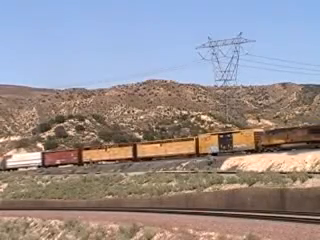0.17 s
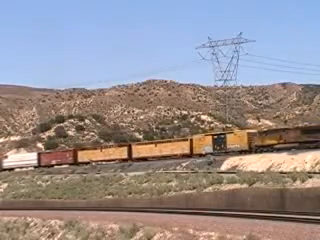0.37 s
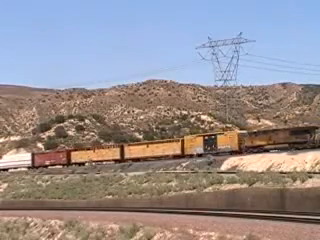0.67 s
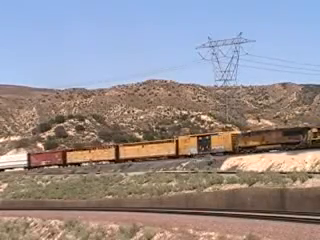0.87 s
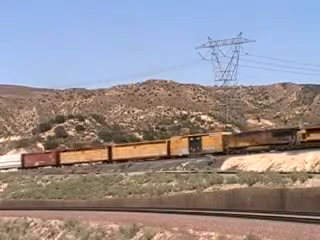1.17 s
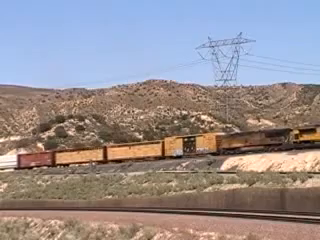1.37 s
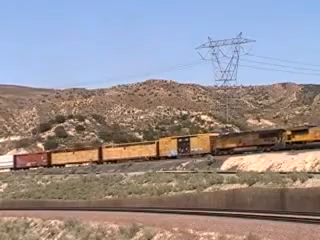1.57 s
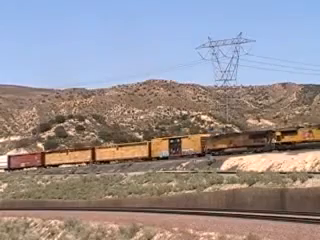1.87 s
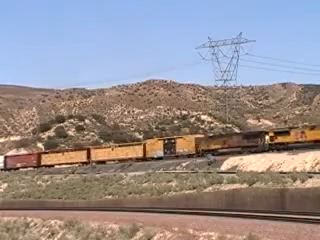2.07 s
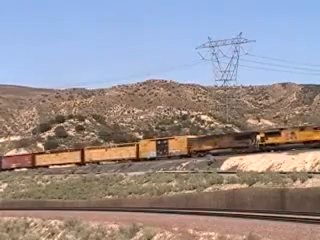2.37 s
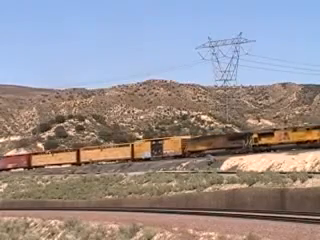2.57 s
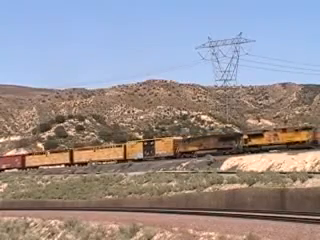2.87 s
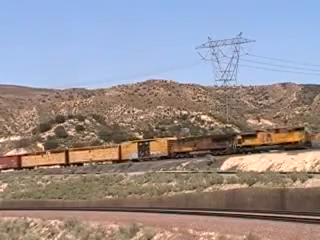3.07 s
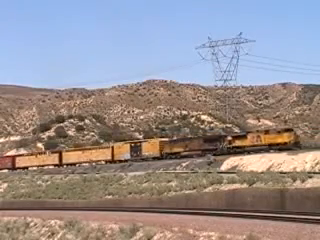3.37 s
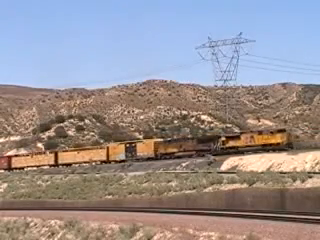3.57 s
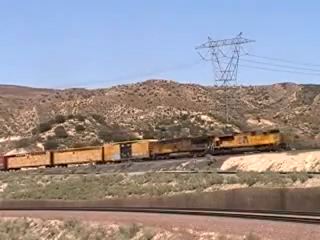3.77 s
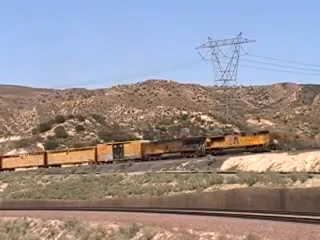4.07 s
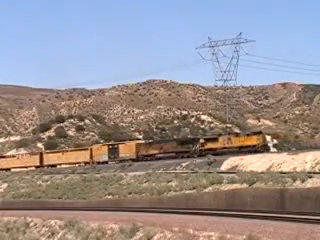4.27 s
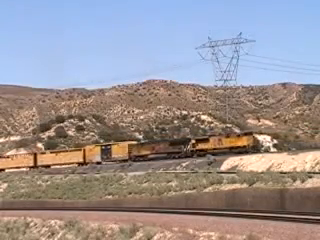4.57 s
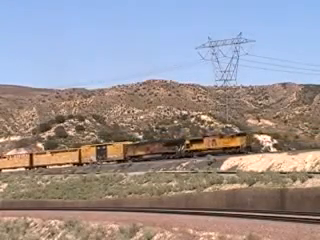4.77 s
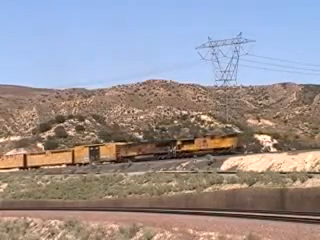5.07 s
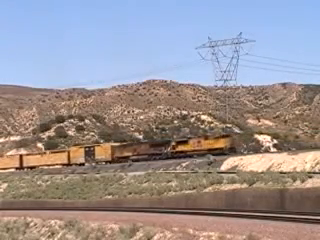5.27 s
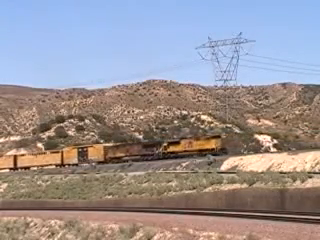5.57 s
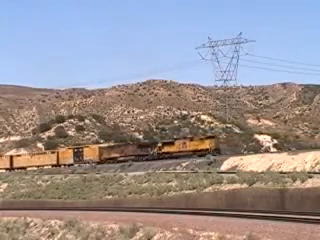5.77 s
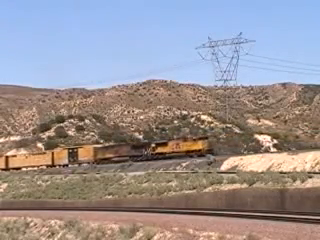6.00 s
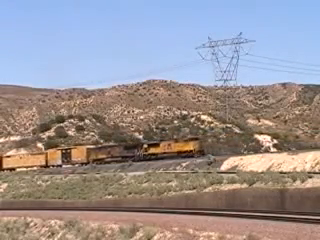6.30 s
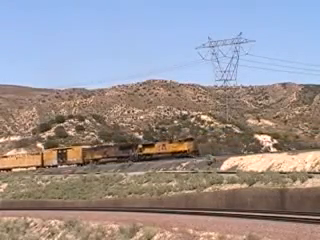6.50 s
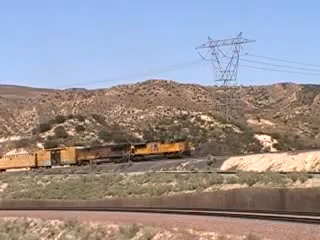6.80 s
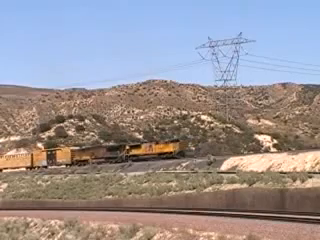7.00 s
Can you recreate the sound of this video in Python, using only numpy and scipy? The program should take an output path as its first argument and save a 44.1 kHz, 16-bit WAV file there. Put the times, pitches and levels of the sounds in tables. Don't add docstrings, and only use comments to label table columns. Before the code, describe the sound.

Outdoors in an open dry valley, a freight train with two diesel locomotives at its rear recedes. Two cooling fans hold a mid-pitched whine, beating about five times a second, over broad wheel and air roar. The whine peaks between one and two and a half seconds, sinks, then returns in softer swells. A small camera microphone far away adds faint close hiss and tiny ticking.

```python
import sys
import numpy as np
from scipy import signal
from scipy.fft import rfft, irfft, next_fast_len
from scipy.io import wavfile
from scipy.ndimage import uniform_filter1d

SR = 44100
rng = np.random.default_rng(int(sys.argv[2]) if len(sys.argv) > 2 else 0)


def boost(x):
    u = np.asarray(x, float) / 20
    return 10 ** u


def generate_wav(signal):
    frames = np.transpose(np.atleast_2d(signal))
    scaled = np.clip(frames, -1, 1) * 32767
    pcm = np.round(scaled).astype(np.int16)
    wavfile.write(sys.argv[1], SR, pcm)


N = 314874
TIME = np.arange(N) / SR

# (f/Hz, level/dB per Hz)
HISS_COLOUR = [(2500, -2), (5000, -2), (7000, -2.5), (10000, -8)]
# (t/s into the turn, level/dB)
HEAD_TICKS = [(.0085, -7.5), (0.0067, 2.5), (.0251, -1.5), (.0105, -7.5)]
# (f/Hz, level/dB, t60/s)
BODY_MODES = [(5930, -73, .02), (6270, -71, .012), (7200, -71, .004), (7900, -68, .022), (8640, -72, .014)]

# (t/s, rolling cars level/dB, locomotives level/dB)
ROAR = [(0.0, -42.5, -46.5), (0.69, -45.5, -44.5), (1.01, -42, -48), (1.51, -44.5, -44.5),
        (1.79, -41, -46.5), (2.09, -41.5, -47), (2.32, -49, -48.5), (2.42, -42, -47.5),
        (3.38, -41.5, -50.5), (3.56, -50.5, -48.5), (3.6, -43, -51), (4.43, -47, -49.5), (5.17, -44, -49.5),
        (5.77, -47.5, -49), (6.12, -42, -51), (6.14, -43.5, -50.5), (7.08, -44.5, -52), (7.14, -43, -52)]
# (f/Hz, level/dB per Hz)
ROAR_COLOUR = [(20, -42.5), (70, -11.5), (112, -18), (185, -5.5), (320, -9.5), (450, -1), (600, -5),
               (880, -2), (1040, -8.5), (1350, -8.5), (2280, -19), (2450, -23), (3500, -32.5),
               (4500, -47.5)]
ROAR_REGIONS = (450, 715, 990, 2200, 3800)
# (share of cars' swing, of locomotives' swing, of gusts, loss with distance/dB per s)
ROAR_FOLLOWS = [
    (0.54, .05, 0.045, 0.02),
    (0.22, 0.66, 0.76, -0.34),
    (.05, 1, 0.22, -0.24),
    (.05, .95, .05, -0.23),
    (.05, .8, .05, 0.47),
]
# (t/s, peak level/dB on the same scale, half-length/s)
GUSTS = [(.03, 3, 0.021), (.62, -6.5, 0.091), (1.22, -3.5, .05), (1.52, 4, 0.15), (2.38, -3.5, .08),
         (3.0, -1.5, .1), (4.45, -7, 0.11), (6.05, -1.5, 0.053), (6.25, -6, 0.042)]

WHINE_PITCHES = (69, 430, 527, 665, 770, 1250, 1324, 1470, 1690, 1980, 2040, 2660, 2803, 3332)
# (width/Hz, rms level/dB)
WHINES = [(8, -73), (40, -53), (10, -55), (6, -58), (10, -58), (6, -60), (8, -59), (10, -58), (8, -64),
          (10, -68), (60, -64), (50, -74), (14, -76), (14, -84)]
# (t/s, peak level/dB, half-length/s)
WHISTLE = [(.24, -63, .03), (.48, -61, .08), (.72, -62, 0.042), (1.78, -63.5, .06), (2.74, -67, 0.034),
           (3.15, -79, 0.17)]
# (t/s, peak level/dB, half-length/s)
BLOWER = [(.48, -51, .04), (.7, -50.5, .07), (.92, -54, .08), (1.65, -51.5, .06)]

# (t/s, slow fan f/Hz, fast fan f/Hz)
FAN_SPEEDS = [(0.0, 841.09, 847.35), (0.42, 841.06, 846.2), (0.84, 840.86, 844.98), (1.26, 840.7, 845.58),
              (1.68, 840.72, 846.4), (2.1, 840.98, 845.15), (2.52, 840.68, 846.27), (2.94, 840.64, 844.89),
              (3.36, 839.89, 844.41), (3.78, 839.06, 844.48), (4.2, 839.58, 844.51), (4.62, 839.45, 844.35),
              (5.04, 838.96, 843.77), (5.46, 838.83, 844.04), (5.88, 838.96, 843.91), (6.3, 839.3, 844.19),
              (6.72, 838.73, 843.33), (7.14, 837.96, 842.24)]
FAN_START_TURNS = (.562, .719, .007)
# (t/s, peak level/dB, half-length/s)
SLOW_FAN = [(0.05, -44.0, 0.11), (0.4, -43.4, 0.09), (0.86, -46.3, 0.27), (1.34, -46.3, 0.07),
            (1.59, -35.5, 0.05), (1.85, -42.6, 0.33), (2.39, -32.7, 0.12), (2.76, -36.3, 0.09),
            (3.05, -40.7, 0.23), (3.72, -44.9, 0.16), (4.01, -48.2, 0.05), (4.73, -50.5, 0.2),
            (5.18, -47.8, 0.07), (5.5, -50.3, 0.15), (6.31, -42.9, 0.12), (6.55, -42.4, 0.05),
            (6.76, -46.0, 0.12)]
# (t/s, peak level/dB, half-length/s)
FAST_FAN = [(0.12, -42.0, 0.08), (0.6, -43.2, 0.12), (1.17, -29.7, 0.05), (1.41, -27.4, 0.06),
            (1.96, -34.8, 0.12), (2.24, -33.7, 0.1), (2.71, -43.9, 0.05), (3.01, -38.9, 0.16),
            (3.44, -45.4, 0.33), (4.11, -53.8, 0.1), (4.37, -49.7, 0.05), (4.91, -50.8, 0.05),
            (5.14, -41.4, 0.18), (5.69, -38.2, 0.13), (6.04, -37.7, 0.06), (6.35, -40.3, 0.19),
            (6.76, -41.5, 0.16), (7.25, -38.4, 0.15)]
# (t/s, peak level/dB, half-length/s)
FAR_FAN = [
    (0.59, -46.4, 0.16),
    (1.27, -41.0, 0.23),
    (1.4, -38.0, 0.08),
]
# (t/s, peak level/dB, half-length/s)
BLADE_PASS = [(.15, -57, 0.3), (1.45, -58, 0.17), (2.73, -63, 0.076), (3.11, -64.5, 0.15), (3.81, -67, 0.1),
              (4.14, -55.5, 0.078), (4.84, -52.5, 0.09), (5.88, -52, 0.2), (6.54, -53.5, 0.09),
              (6.9, -55, 0.14)]
# (t/s, peak level/dB, half-length/s)
FOURTH = [(0.2, -44.8, 0.07), (0.45, -43, 0.08), (0.67, -44, 0.043), (0.94, -42, 0.089), (1.2, -43, 0.043),
          (1.46, -42, 0.05), (1.64, -43.5, 0.18), (1.87, -51.5, 0.028), (2.0, -43.1, 0.05),
          (2.25, -42, 0.043), (2.5, -40, 0.13), (2.82, -47.5, 0.045), (3.09, -51.4, 0.1),
          (3.36, -54.3, 0.054), (4.03, -52.5, 0.098), (4.33, -49, 0.05), (4.73, -45.8, 0.17),
          (5.32, -48, 0.12), (6.1, -50.5, 0.19), (6.71, -50.5, 0.14)]
# (t/s, peak level/dB, half-length/s)
FIFTH = [(0.58, -57.3, 0.13), (1.59, -50, 0.39), (2.2, -60, 0.16), (2.85, -62, 0.22), (4.46, -54.5, 0.35),
         (4.78, -64, 0.34), (5.59, -51, 0.21), (6.33, -56.5, 0.19), (7.06, -76, 0.047)]
# (multiple of blade rate, level/dB against the third)
FAINT_HARMONICS = [(2, -22), (6, -25), (7, -40.5), (9, -47), (10, -34)]


def in_time(rows):
    s, *columns = np.transpose(rows)
    return [np.interp(TIME, s, column) for column in columns]


def rms_one(x):
    return x / np.sqrt(np.mean(x ** 2) + 1e-30)


def drift(rate_hz):
    hop = 40
    r = np.exp(-2 * np.pi * rate_hz * hop / SR)
    white = rng.standard_normal(N // hop + 2002)
    slow = signal.lfilter([1], [1, -2 * r, r * r], white)[2000:]
    return np.interp(np.arange(N) / hop, np.arange(len(slow)), rms_one(slow - slow.mean()))


def swells(rows, floor_db):
    t = np.arange(0, N + 64, 64) / SR
    bells = np.zeros(len(t))
    for s, peak_db, length in rows:
        bells += boost(peak_db) * np.exp(-.5 * ((t - s) / length) ** 2)
    return np.interp(TIME, t, 20 * np.log10(boost(floor_db) + bells))


def coloured(points):
    size = next_fast_len(N)
    hz = np.maximum(np.arange(size // 2 + 1) * SR / size, 1)
    at, level_db = np.transpose(points)
    gain = boost(np.interp(np.log(hz), np.log(at), level_db, left=-60))
    white = rng.standard_normal(size)
    return rfft(rms_one(irfft(rfft(white) * gain, size))), hz


def narrow_noise(hz, width_hz):
    r = np.exp(-np.pi * width_hz / SR)
    a = [1, -2 * r * np.cos(2 * np.pi * hz / SR), r * r]
    once = signal.lfilter([1, 0, -1], a, rng.standard_normal(N))
    return rms_one(signal.lfilter([1, 0, -1], a, once))


def tone(turns, rms_db):
    return np.sqrt(2) * boost(rms_db) * np.sin(2 * np.pi * turns)


def tape_hiss():
    spectrum, _ = coloured(HISS_COLOUR)
    return boost(-78) * irfft(spectrum, next_fast_len(N))[:N]


def head_drum():
    turns_per_s = 30000 / 1001
    starts = np.arange(int(N / SR * turns_per_s)) / turns_per_s
    clicks = np.full(N, 1e-18)
    for into, tick_db in HEAD_TICKS:
        clicks[np.round((starts + into) * SR).astype(int)] = boost(tick_db - 12.5)
    out = np.zeros(N)
    for hz, level_db, t60 in BODY_MODES:
        r, w = boost(-60 / (t60 * SR)), 2 * np.pi * hz / SR
        out += boost(level_db) * signal.lfilter([0, np.sin(w)], [1, -2 * r * np.cos(w), r * r], clicks)
    return signal.sosfilt(signal.butter(4, 4500, "high", fs=SR, output="sos"), out)


def roar(patchy_db):
    spectrum, hz = coloured(ROAR_COLOUR)
    spectrum = spectrum * boost(-40 * np.log2(np.maximum(hz / 4500, 1)))
    movers = in_time(ROAR) + [swells(GUSTS, floor_db=5), -TIME]
    region_db = np.dot(ROAR_FOLLOWS, [mover - mover.mean() for mover in movers])
    centres = np.geomspace(40, 5000, num=22)
    out = np.zeros(N)
    for k, centre in enumerate(centres):
        share = np.interp(np.log(hz), np.log(centres), np.arange(len(centres)) == k)
        weights = [np.interp(np.log(centre), np.log(ROAR_REGIONS), row) for row in np.eye(len(ROAR_REGIONS))]
        moving = np.clip(np.log2(centre / 180), 0, 1)
        gain_db = moving * np.dot(weights, region_db) + patchy_db * drift(2.5)
        out += boost(gain_db) * irfft(spectrum * share, 2 * len(hz) - 2)[:N]
    return boost(-38.5) * out


def whines():
    out = np.zeros(N)
    for hz, (width_hz, level_db) in zip(WHINE_PITCHES, WHINES):
        out += boost(level_db + 1.8 * drift(.6)) * narrow_noise(hz, width_hz)
    locomotives_db = in_time(ROAR)[1]
    return out * boost(1.1 * (locomotives_db - locomotives_db.mean()))


def whistle():
    turns = 3027 * TIME + .25 * drift(3.5)
    return tone(turns, swells(WHISTLE, floor_db=-75.5))


def blower():
    turns = 1470 * TIME + .2 * drift(3.5)
    return tone(turns, swells(BLOWER, floor_db=-70))


def fans():
    slow_hz, fast_hz = in_time(FAN_SPEEDS)
    slow_third = np.cumsum(slow_hz) / SR + FAN_START_TURNS[0]
    fast_third = np.cumsum(fast_hz) / SR + FAN_START_TURNS[1]
    far_third = 849.564 * TIME + FAN_START_TURNS[2]
    thirds = tone(slow_third, swells(SLOW_FAN, floor_db=-64))
    thirds += tone(fast_third, swells(FAST_FAN, floor_db=-64))
    thirds += tone(far_third, swells(FAR_FAN, floor_db=-64))
    out = boost(.2) * thirds

    slow_blade, fast_blade = slow_third / 3, fast_third / 3
    out += tone(fast_blade, swells(BLADE_PASS, floor_db=-62.5))
    fourth_hz = uniform_filter1d(fast_hz, size=SR // 2) * 1.3325
    out += tone(np.cumsum(fourth_hz) / SR, swells(FOURTH, floor_db=-58.5))
    out += boost(swells(FIFTH, floor_db=-60)) * narrow_noise(1409, width_hz=24)
    for multiple, level_db in FAINT_HARMONICS:
        for blade in (slow_blade, fast_blade):
            turns = multiple * blade + .15 * drift(2.5)
            out += tone(turns, level_db - 43 + 4.5 * drift(1.1))
    return out


def flutter(depth_db, rate_hz):
    return boost(depth_db * drift(rate_hz))


def scene():
    camera = tape_hiss() + head_drum()
    train = roar(patchy_db=1.39) + whines() + whistle()
    spinning = (blower() + fans()) * flutter(depth_db=1.2, rate_hz=14)
    return (camera + train + spinning)[None, :]


def top_cut(x):
    return signal.sosfilt(signal.butter(12, 10020, fs=SR, output="sos"), x)


def record(dry):
    to_end = np.arange(N)[::-1] / (.001 * SR)
    fade = np.sin(np.pi / 2 * np.minimum(to_end, 1)) ** 2
    return top_cut(dry * fade)


dry = scene()
out = record(dry)
generate_wav(out)
```